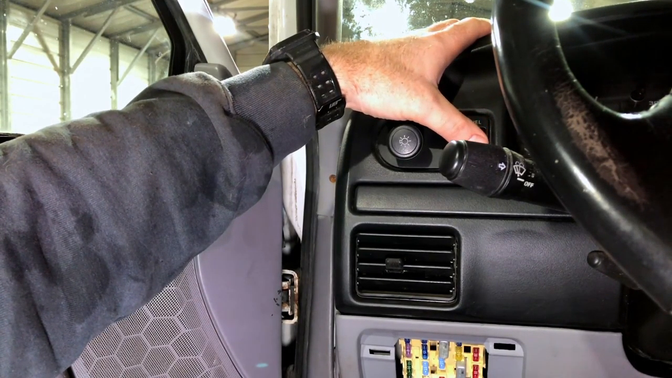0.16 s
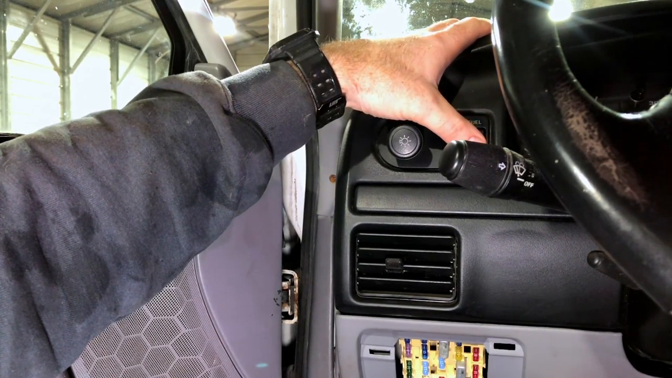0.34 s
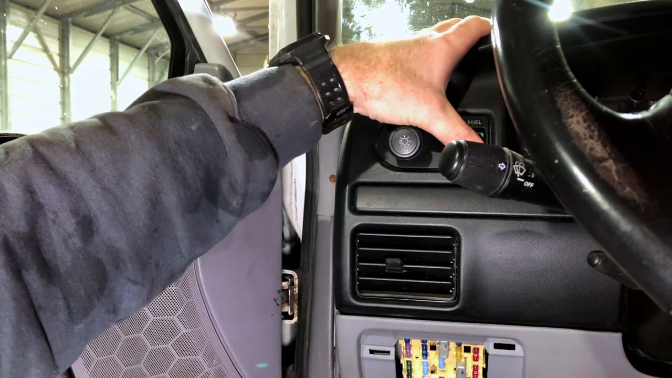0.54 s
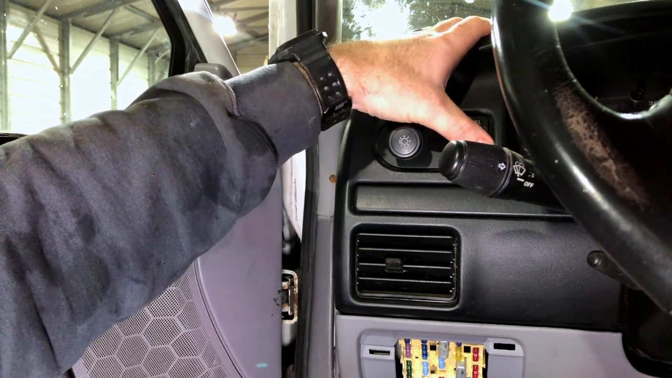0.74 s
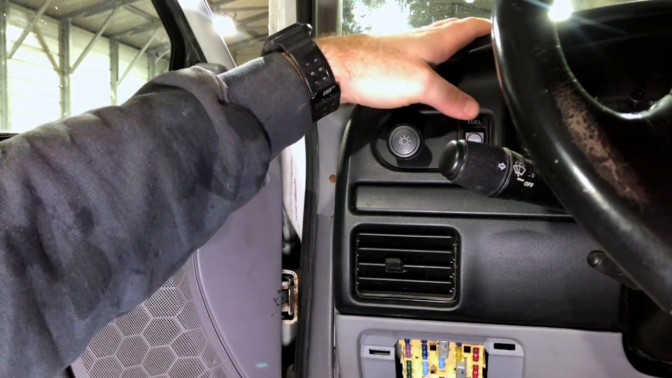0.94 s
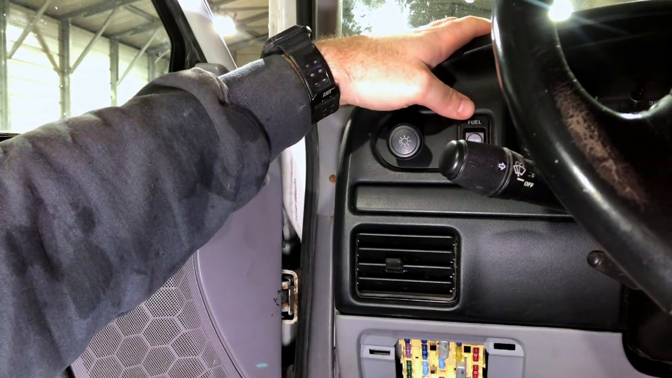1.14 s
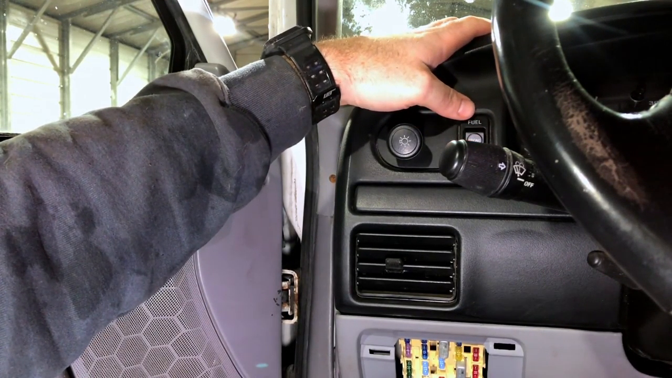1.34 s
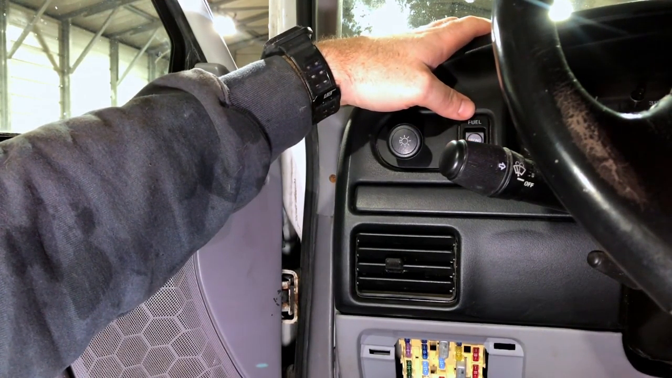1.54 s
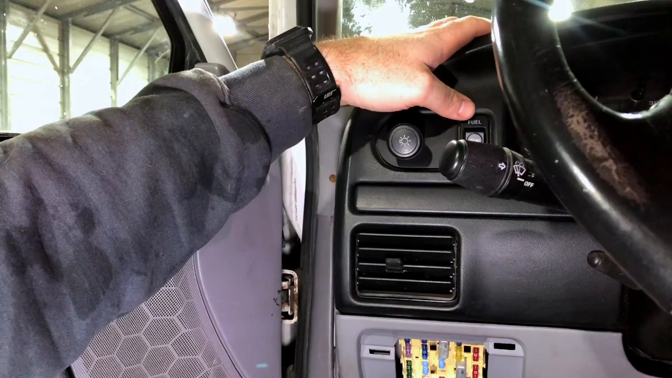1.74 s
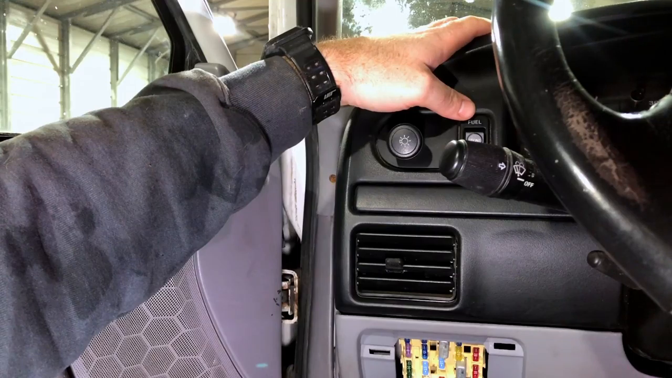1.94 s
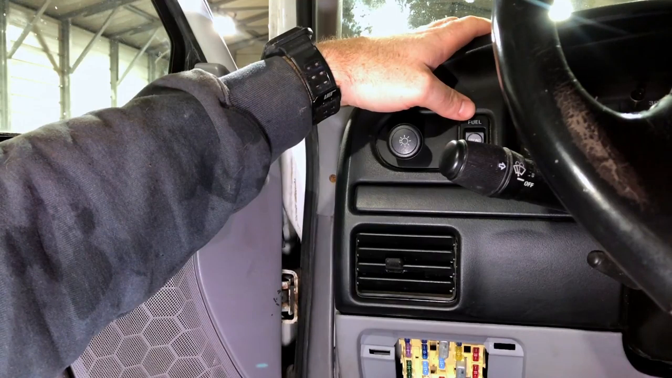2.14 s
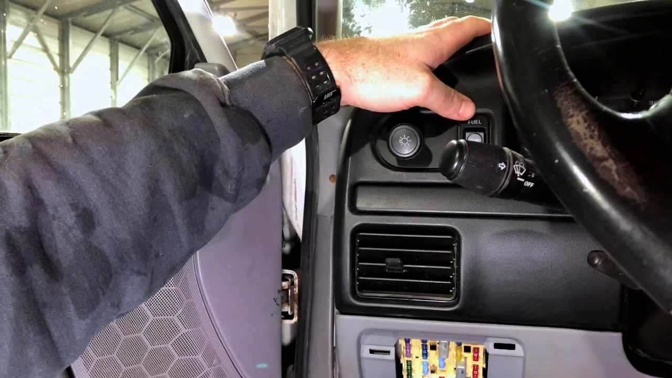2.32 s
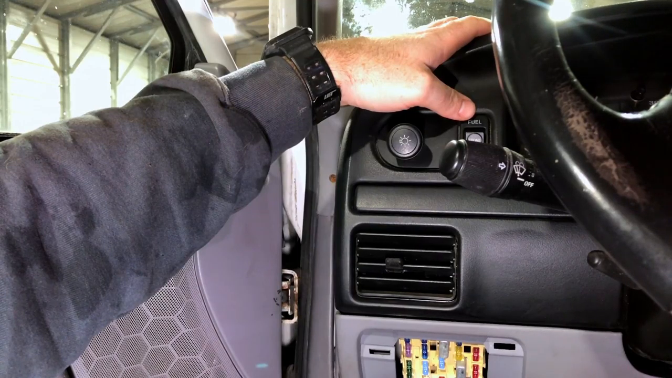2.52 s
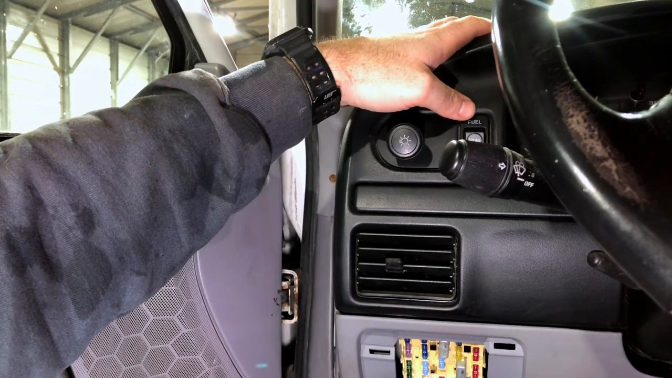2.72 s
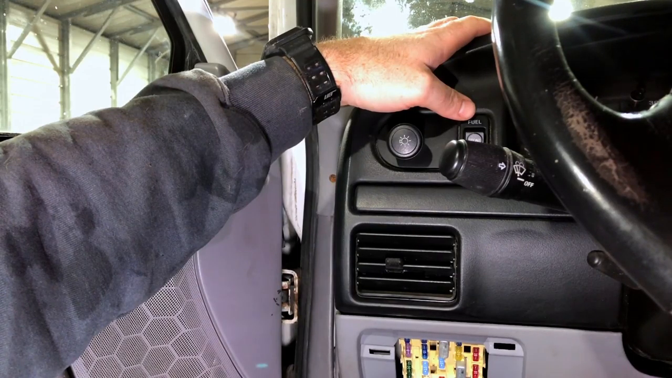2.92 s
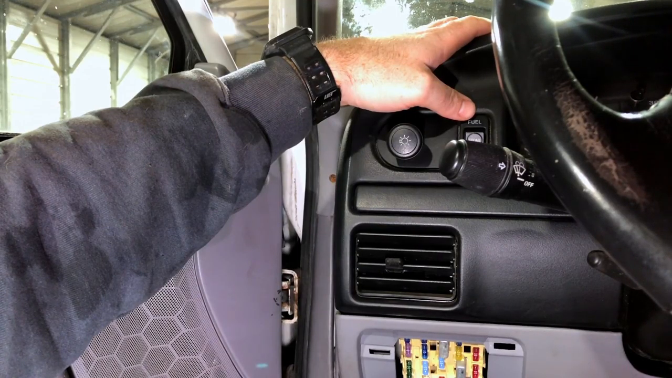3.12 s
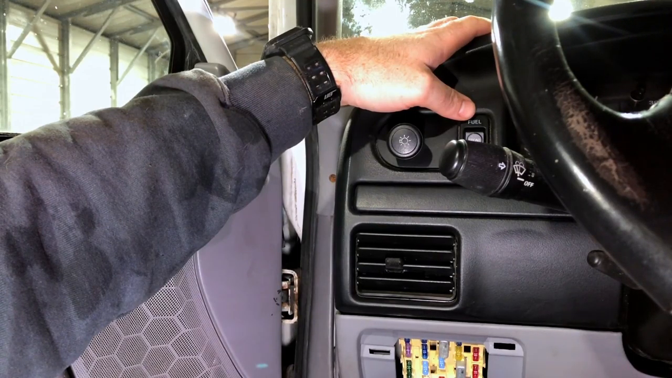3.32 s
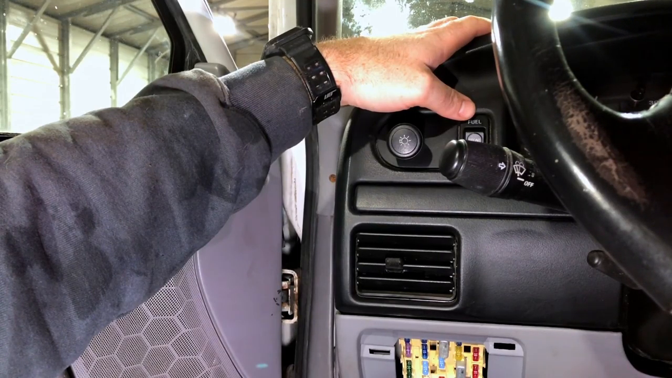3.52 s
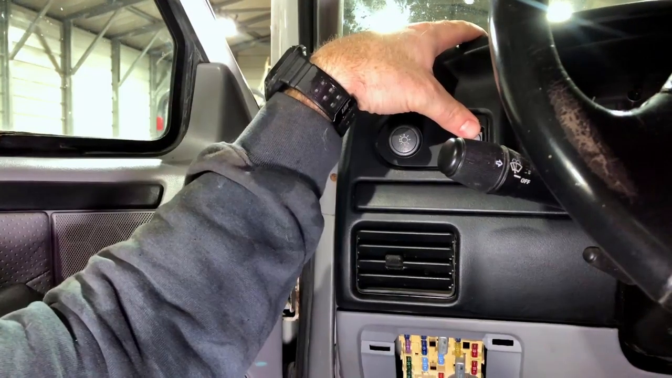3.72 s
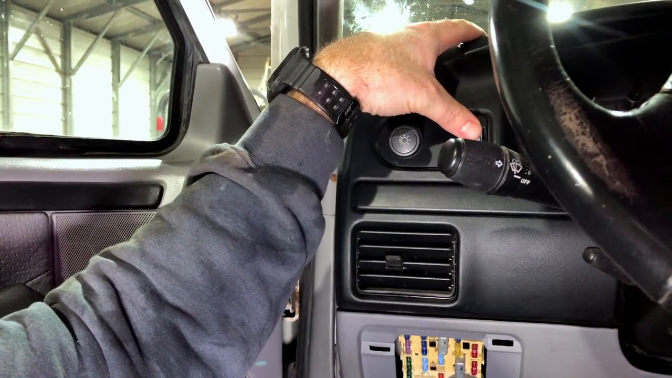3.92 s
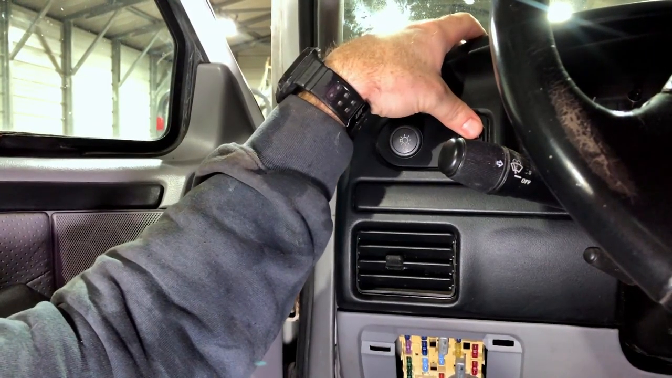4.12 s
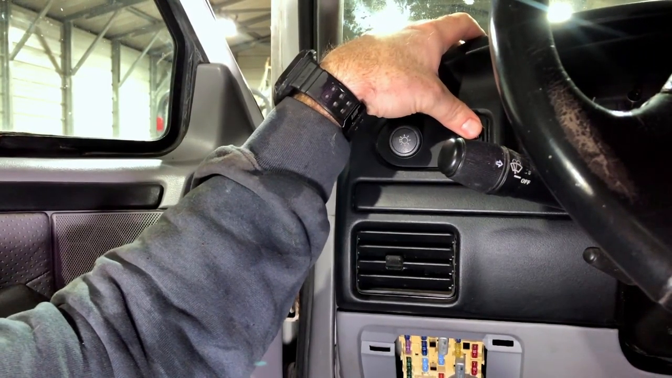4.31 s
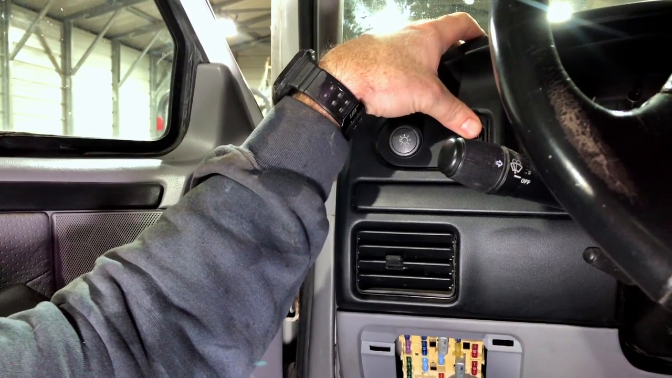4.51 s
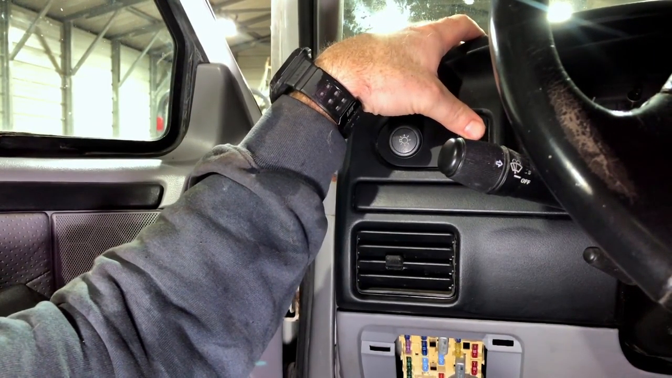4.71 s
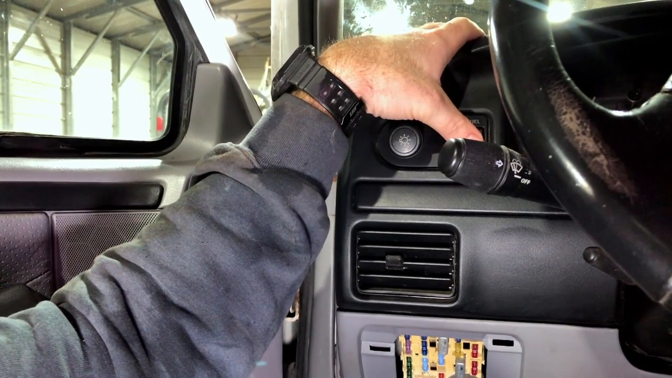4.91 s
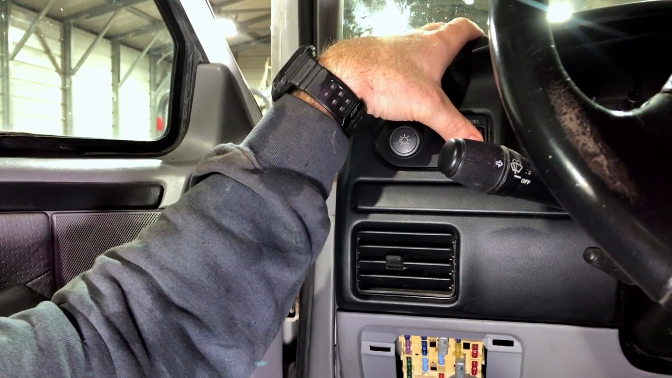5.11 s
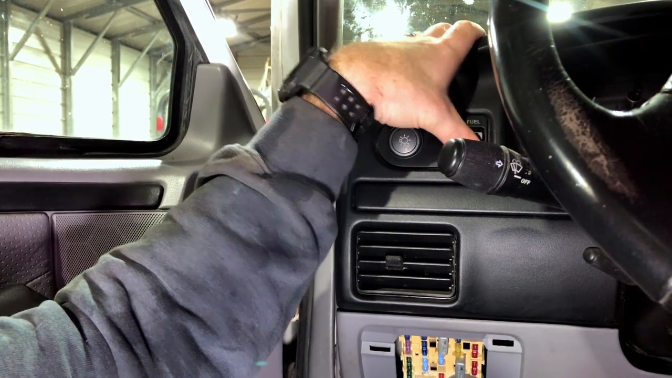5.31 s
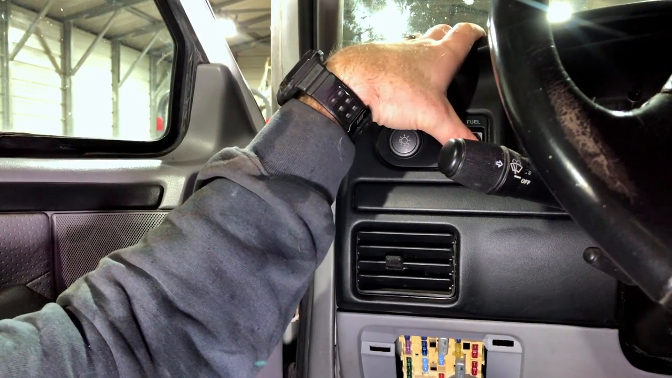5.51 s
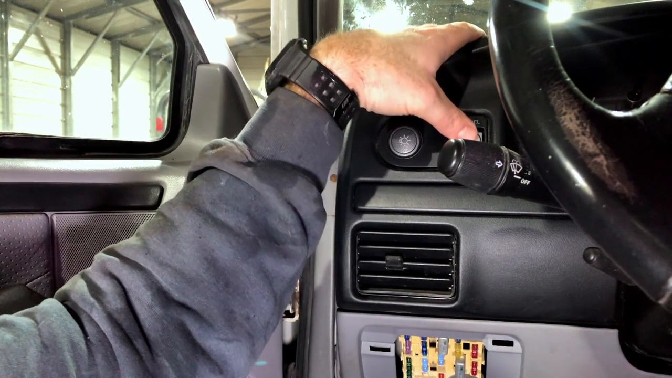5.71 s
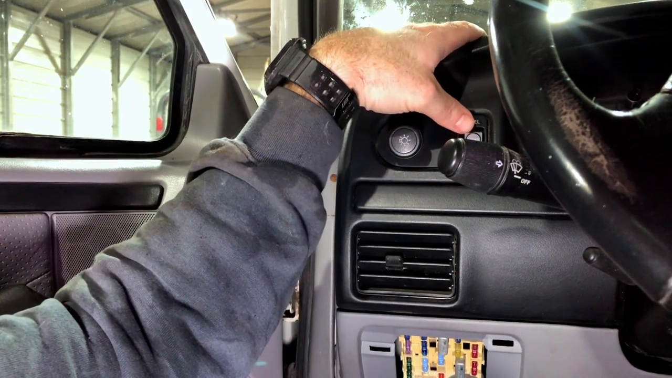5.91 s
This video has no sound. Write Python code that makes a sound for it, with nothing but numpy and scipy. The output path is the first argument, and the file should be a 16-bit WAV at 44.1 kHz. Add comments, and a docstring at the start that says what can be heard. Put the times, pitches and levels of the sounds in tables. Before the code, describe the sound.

A stiff dashboard button in a parked vehicle snaps over three times with sharp plastic clacks, preceded by small creaky ticks, over faint rumble.

```python
"""A stiff dashboard button is pressed three times in a parked cab: the plastic creaks and ticks, then snaps over.
Each contact is damped panel modes plus dying noise for the cab; low sines rock the dashboard.
A thumb rubs off the panel once, as noise and stick-slip pulses through resonances.
The shed outside answers longer, by convolution; rumble, faint insects, a thin far tone
and microphone hiss, all shaped noise, lie under it."""
import sys
import numpy as np
from scipy import signal
from scipy.fft import rfft, irfft, next_fast_len
from scipy.io import wavfile
from scipy.ndimage import uniform_filter1d, map_coordinates

SR = 44100
rng = np.random.default_rng(int(sys.argv[2]) if len(sys.argv) > 2 else 0)


def wrap_up_sound(samples):
    """Save the sound to the file named by the first command line argument, as 16-bit audio."""
    columns = np.atleast_2d(samples).T
    # keep every value between -1 and 1, then stretch to whole-number steps
    tamed = np.clip(columns, -1, 1)
    steps = np.round(tamed * 32767).astype(np.int16)
    wavfile.write(sys.argv[1], SR, steps)


N = 262395


def switch():
    """Each contact rings the panel and fills the cab with dense reflections; the dashboard booms and rocks."""
    # Ringing modes of the panel: (frequency [Hz], relative level [dB], t60 [s])
    panel_modes = [(634, 6, 0.16), (1144, -1, 0.26), (1200, -14.5, 0.023), (1630, -0.5, 0.078),
                   (2110, -12.5, 0.081), (2438, 1.5, 0.076), (2680, 5, .03), (2833, -5.5, 0.13),
                   (3600, -10.5, 0.035), (4310, -11, .04)]
    # Colour of a contact heard close by: (frequency [Hz], relative density [dB per Hz])
    contact_colour = [(150, -33.5), (280, -10.5), (420, -11), (630, -3), (850, -6.5), (1150, -4.5),
                      (1650, -6.5), (2700, -8), (3000, -7), (3700, -14), (4300, -12), (7500, -13.5),
                      (11500, -15), (15600, -18.5)]
    # Decay of the cab's reflections: (frequency [Hz], t60 [s])
    cab_decay = [(300, 0.48), (1000, 0.16), (3000, 0.12), (8000, 0.11), (15000, 0.15)]
    # The first, short crack is brighter: (frequency [Hz], relative level [dB])
    crack_colour = [(700, -13), (1500, 3), (2700, 6.5), (4500, 2.5), (12000, 6)]
    # The hollow dashboard booms on: (frequency [Hz], relative level [dB], t60 [s])
    boom_modes = [(112, -35.5, 0.24), (143, -30, 0.2), (217.7, -34, 0.31), (239.7, -32.5, 0.3),
                  (323, -38, 0.11)]
    # The hand rocks the whole dashboard: (time [s], level before the onset fade [dB], frequency [Hz], t60 [s])
    thumps = [(0.501, -32.5, 105.4, 0.62), (0.558, -29, 110.7, 0.49), (.57, -20.5, 45.6, 0.12),
              (0.623, -23.5, 48.5, 0.32), (.775, -28.5, 40.55, 0.17), (.86, -31, 41.5, 0.17),
              (1.187, -31.5, 37.6, 0.16), (4.086, -27.5, 48.9, 0.29), (5.365, -19.5, 54.7, 0.15),
              (5.406, -16, 51.15, 0.16), (5.494, -31, 51.3, 0.54), (5.699, -34, 54.1, 0.36)]
    crack_decay = [(1000, 0.0037), (12000, 0.018)]  # (Hz, t60 s)

    out, size = np.zeros(N + SR), SR // 3
    t = np.arange(size) / SR
    # sound leaves by the open door: the ring holds for some wall trips, then drops
    leak_db = -12 / (1 + np.exp(-(t - .027) / 0.0079))
    panel_rise = 1 - np.exp(-t / 0.0014)  # the panel takes a moment to ring up
    boom_rise = 1 - np.exp(-t / 0.011)
    for s, db, knock_db, edge_db, crack_db, rise_ms in contacts():
        rise = 1 - np.exp(-t * 1000 / max(rise_ms, .1))
        # weak ticks come from the small button more than from the panel: more near 5 kHz, less above
        small_db = -.12 * db
        tilt = [(700, knock_db), (1400, 0.0035), (2800, edge_db),
                (5000, .6 * crack_db + small_db), (10000, crack_db - 0.78 * small_db)]
        tilted_panel = [(hz, level + along(tilt, hz), t60) for hz, level, t60 in panel_modes]
        ring = modes(tilted_panel, t, spread_db=0.0)

        air = amp(leak_db + 5.5) * dying(lambda hz: 0 * hz, cab_decay, size=size, order=128)
        air += dying(lambda hz: along(crack_colour, hz), crack_decay, size=size, order=64)
        air = filtered(air, lambda hz: amp(along(contact_colour, hz) + along(tilt, hz)))

        boom = boom_rise * modes(boom_modes, t, spread_db=1.5)
        panel = amp(1.1 * leak_db - 21.5) * panel_rise * ring
        out[round(s * SR):][:size] += amp(db) * (rise * (panel + air) + boom)
    for s, db, hz, t60 in thumps:
        onset = 1 - np.exp(-t / 0.0046)
        out[round(s * SR):][:size] += amp(db - 60 * t / t60) * onset * np.sin(2 * np.pi * hz * t)
    return out[:N]


def contacts():
    """Rows (s, level dB, knock dB, edge dB, crack dB, rise ms) for ticks, lead-ins and snaps."""
    # The button snaps over: (time [s], relative level [dB], knock below 700 Hz [dB],
    # edge near 3 kHz [dB], crack above 6 kHz [dB])
    snaps = [(0.5543, 2, -8, -8, -9.5), (4.0544, 4.5, -5.5, 3.5, -4), (5.3294, 2.5, -9.5, -2, -6)]
    # The plastic ticks under the thumb: (time [s], relative level [dB], edge near 3 kHz [dB],
    # crack above 6 kHz [dB], rise time constant [ms])
    tick_rows = [(0.0972, -46, 3.5, -9.5, 1.3), (.154, -35.5, -11, -26, .77),
                 (0.4677, -24.5, -2, -14.5, .7), (0.4894, -29.5, 0, -9, 1.9), (0.525, -27.5, 2, -7, .7),
                 (0.5319, -20.5, 3.5, -9, 2.1), (0.706, -32, -1, -13, .51), (.7332, -35, -1, -24, 1.4),
                 (3.9657, -22.5, -1.5, -14, .91), (3.9976, -25, -2, -14.5, .62),
                 (4.0385, -16.5, -1.3, -5, 2.5), (4.6871, -38.5, -5.5, -25, .62),
                 (5.0091, -45, -1.2, -17, 2.65), (5.212, -19, 0.5, -8.5, .41),
                 (5.2537, -19.5, -1.5, -12.5, .78), (5.285, -27.5, 7.5, -9.5, 3.1),
                 (5.3034, -25.5, 5, -6, 1.3), (5.4709, -34, -5.5, -12, .4), (5.571, -38.5, 2, -5.5, .72),
                 (5.5842, -30.5, -2, -25, 3)]
    # softer ticks are duller thuds; no knock tilt at the even level
    knock_per_db, even_knock_db = -0.49, -33
    # the spring lets go just before the snap, as a thin lead-in
    spring_early_s, spring_db, spring_rise_ms = .003, -8.5, 1.9
    spring_knock_db, spring_edge_db, spring_crack_db = -22, 1.5, -2
    snap_rise_ms = .3

    ticks = [(s, db, knock_per_db * (db - even_knock_db), *rest) for s, db, *rest in tick_rows]
    springs = [(s - spring_early_s, db + spring_db, spring_knock_db, spring_edge_db,
                spring_crack_db, spring_rise_ms) for s, db, *_ in snaps]
    return ticks + springs + [(*row, snap_rise_ms) for row in snaps]


def thumb():
    """Skin sticks and slips: each slip scrapes, rings the trim and kicks low panel resonances."""
    # The thumb drags off the panel: (time [s], scrape level [dB], judder level [dB])
    rub = [(.8, -69, -74), (.852, -54.5, -46), (.9, -58.5, -49), (.94, -50.5, -37.5), (.953, -38.5, -39),
           (.98, -34, -37), (1.03, -33.5, -33), (1.05, -44, -31.5), (1.07, -59, -37), (1.11, -71.5, -46.5),
           (1.17, -72, -53), (1.26, -74.5, -62.5)]
    # The thumb shifts briefly on the button: (time [s], length [s], scrape level [dB], judder level [dB])
    shift_rows = [(.59, 0.13, -60, -45), (5.275, 0.12, -44.5, -45), (5.482, 0.074, -63, -46.5)]
    # Colour of the scrape: (frequency [Hz], relative density [dB per Hz])
    scrape_colour = [(160, -33), (280, 1.5), (606, -9), (667, -11), (993, -1), (1090, -6.5), (1550, -7.5),
                     (5000, -25), (6500, -55), (11000, -120)]
    # Thin trim set ringing by the slips: (centre [Hz], width [Hz], relative level [dB])
    trim_bands = [(3320, 330, -5.5), (4500, 1300, -1.5), (7200, 1500, 0), (10640, 750, -3.5),
                  (13500, 3000, -11)]
    shift_fade_db = -17.5  # over a shift's length
    # grit level at the even scrape level; it grows faster than the scrape, between a floor and the scrape
    grit_even_db, even_scrape_db, grit_per_db, grit_least_db = -44.5, -30.5, 1.4, -82.5
    # slip rate [per s]: fastest at the peak, steady well before and after
    peak_rate, peak_s, before_rate, after_rate = 186, .99, 150, 112
    speeds_up, slows_down = 900, 900  # slips a second gained before the peak, lost after, per s

    def trim(f):
        return sum((-1) ** k * amp(db) * resonance(hz, width)(f)
                   for k, (hz, width, db) in enumerate(trim_bands))

    def low_panel(f):
        return (resonance(155, 110)(f) ** 2 + 0.25 * resonance(320, 220)(f) ** 2
                + 0.12 * resonance(460, 200)(f) ** 2)

    out = np.zeros(N)
    late = np.arange(N) / SR - peak_s
    near_peak = peak_rate + np.minimum(speeds_up * late, -slows_down * late)
    rate = np.maximum(near_peak, np.where(late < 0, before_rate, after_rate))
    shifts = [[(s, a, b), (s + length, a + shift_fade_db, b + shift_fade_db)]
              for s, length, a, b in shift_rows]
    for stroke in [rub] + shifts:
        scrape_db, judder_db = curves(stroke)
        grit_db = np.maximum(grit_even_db + grit_per_db * (scrape_db - even_scrape_db), grit_least_db)
        grit_db = np.minimum(grit_db, scrape_db)

        turns = np.cumsum(rate * (1 + 0.04 * wobble(60))) / SR
        slips = np.diff(np.floor(turns), prepend=0) * amp(2.5 * wobble(150))
        burst = np.exp(-(turns % 1) / .25)  # friction noise peaks at each slip

        scrape = (1 + 0.52 * burst) * rng.standard_normal(N) + 1.0 * unit(slips)
        out += amp(scrape_db) * unit(filtered(scrape, lambda hz: amp(along(scrape_colour, hz))))
        grit = (0.32 + burst) * rng.standard_normal(N)
        out += amp(grit_db) * unit(filtered(grit, trim))
        kicks = unit(slips) + .5 * rng.standard_normal(N)
        out += amp(judder_db) * unit(filtered(kicks, low_panel))
    return out


def shed(x):
    """The longer answer of the building swells in as far walls reply: convolution with dying noise."""
    # Decay of the shed: (frequency [Hz], t60 [s])
    shed_decay = [(200, .8), (1000, .95), (3000, .95), (5000, .85), (9000, .55), (15000, .35)]
    # Colour of its answer: (frequency [Hz], relative level [dB])
    shed_colour = [(100, 4), (500, 4.5), (1500, 0), (3000, 0), (5000, 1.5), (9000, -2), (15000, -2)]
    tail = dying(lambda hz: along(shed_colour, hz), shed_decay, size=SR, order=256)
    tail *= 1 - np.exp(-np.arange(SR) / SR / 0.015)
    return signal.fftconvolve(x, tail / np.linalg.norm(tail))[:N]


def rumble():
    """Far traffic and a shaking body: two low noise bands with their own swells partly evened out."""
    # Level of the rumble: (time [s], 25-70 Hz level [dB], 70-130 Hz level [dB])
    rumble_levels = [(0.0, -51, -53.5), (0.35, -46.5, -55), (0.6, -53, -57), (0.69, -47.5, -53),
                     (1.09, -45, -51.5), (1.28, -47, -53.5), (1.76, -52, -55), (1.92, -48.5, -59),
                     (2.12, -48, -50.5), (2.48, -49, -57.5), (2.82, -47, -53), (3.56, -50, -63),
                     (4.04, -44.5, -52.5), (4.22, -42, -54), (4.49, -45.5, -60.5), (5.22, -47.5, -50.5),
                     (5.53, -44.5, -53.5), (5.95, -47, -55.5)]
    # Colour of the lower band: (frequency [Hz], relative density [dB per Hz])
    deep_colour = [(7.1, -38), (12, -6.5), (37, 3), (52, 2.5), (70, -8.5), (90, -5.5), (120, -29.5),
                   (200, -120)]
    # Colour of the upper band: (frequency [Hz], relative density [dB per Hz])
    drone_colour = [(35, -32), (60, -8.5), (101, 1), (115, 0), (124, -13.5), (200, -25.5), (260, -46),
                    (440, -120)]

    def even(x, size):
        power = np.abs(uniform_filter1d(x * x, size))
        return unit(x / power ** 0.28)

    deep_db, drone_db = curves(rumble_levels)
    deep = amp(deep_db) * even(noise(deep_colour), size=6000)
    drone = amp(drone_db) * even(noise(drone_colour), size=4000)
    return deep + drone


def outdoors():
    """A narrow, fluttering insect band, a thin far tone of very narrow noise, and microphone hiss."""
    # Insect chorus: (time [s], level [dB])
    insect_levels = [(0, -75.5), (1, -77.5), (1.5, -74), (1.9, -81), (2.3, -78), (3.4, -80), (3.9, -69),
                     (5, -69), (5.5, -71.5), (5.95, -66)]
    # Thin far tone: (time [s], level [dB])
    whine_levels = [(1.1, -92), (1.3, -79), (3.5, -81), (3.7, -92.5)]
    # Colour of the microphone hiss: (frequency [Hz], relative density [dB per Hz])
    hiss_colour = [(76, -38.5), (130, -2), (162, 1), (232, -5), (459, -8.5), (926, -13), (2330, -18.5),
                   (2790, -18.5), (3140, -19), (14100, -33), (15600, -41.5)]
    hiss_db = -61

    def band(hz, width_hz):
        return unit(filtered(rng.standard_normal(N), lambda f: resonance(hz, width_hz)(f) ** 2))

    chorus = amp(curves(insect_levels)[0] + 1.5 * wobble(29)) * band(2700, 300)
    tone = amp(curves(whine_levels)[0]) * band(1900, 22)
    hiss = amp(hiss_db + 0.44 * wobble(18)) * noise(hiss_colour)
    return chorus + tone + hiss


def amp(db):
    """Gain of a level in dB."""
    return 10 ** (np.asarray(db) / 20)


def unit(x):
    """x at rms 1."""
    return x / np.sqrt(np.mean(x ** 2) + 1e-20)


def along(points, hz):
    """Values between (Hz, value) points on a log frequency axis."""
    f, v = np.transpose(points)
    return np.interp(np.log(hz + 1), np.log(f + 1), v)


def curves(rows):
    """One dB value per sample for each column after the time; -150 dB outside."""
    s, *cols = np.transpose(rows)
    return [np.interp(np.arange(N) / SR, s, c, -150, -150) for c in cols]


def wobble(rate):
    """A smooth random curve, rate knots a second."""
    knots = rng.standard_normal(int(N * rate / SR) + 4)
    return map_coordinates(knots, [np.arange(N) * rate / SR])


def filtered(x, response):
    """x times a response of frequency, zero-padded so that ringing does not wrap straight round."""
    m = next_fast_len(len(x) + 8192)
    return irfft(rfft(x, m) * response(np.fft.rfftfreq(m, 1 / SR)), m)[:len(x)]


def noise(spectrum):
    """Noise of rms 1 with a (Hz, dB) colour."""
    return unit(filtered(rng.standard_normal(N), lambda hz: amp(along(spectrum, hz))))


def resonance(centre_hz, width_hz):
    """Response of one causal resonance, gain 1 at its centre."""
    return lambda f: 1j * f * width_hz / (centre_hz ** 2 - f * f + 1j * f * width_hz)


def dying(colour_db, t60s, size, order):
    """Noise in which each frequency dies at its own speed; order is the STFT window in samples."""
    hz, t, z = signal.stft(rng.standard_normal(size), SR, nperseg=order)
    level_db = colour_db(hz)[:, None] - 60 * t / along(t60s, hz)[:, None]
    return signal.istft(z * amp(level_db), SR, nperseg=order)[1][:size]


def modes(table, t, spread_db):
    """Damped sines at random phases, their strengths scattered by spread_db."""
    return sum(amp(db + rng.normal(0, spread_db) - 60 * t / t60)
               * np.sin(2 * np.pi * (hz * t + rng.random())) for hz, db, t60 in table)


def scene():
    """Near sounds with their echo over the background."""
    near = switch() + thumb()
    return (near + amp(-30) * shed(near) + rumble() + outdoors())[None]


def record(dry):
    """Peaks near full scale are rounded off; a steep low-pass takes 80 dB off above the band limit."""
    top_hz = 15800
    hard = dry[0] / (1 + np.abs(dry[0]) ** 8) ** (1 / 8)
    return filtered(hard, lambda hz: amp(-80 / (1 + np.exp((top_hz + 100 - hz) / 50))))[None]


dry = scene()
out = record(dry)
wrap_up_sound(out)
```